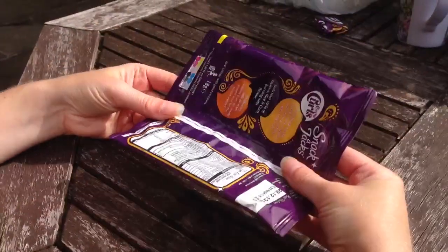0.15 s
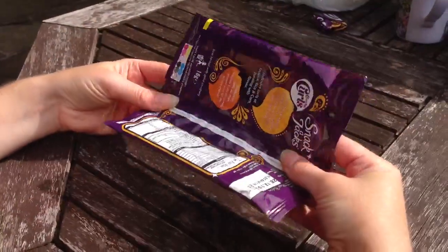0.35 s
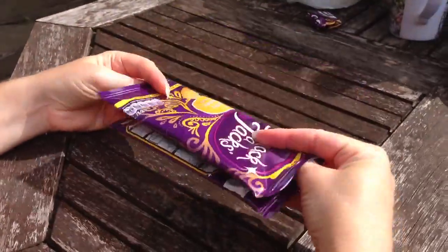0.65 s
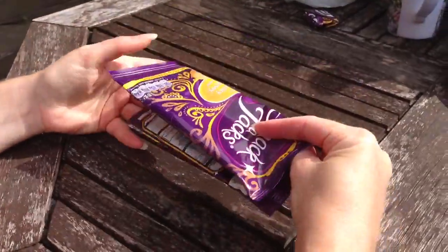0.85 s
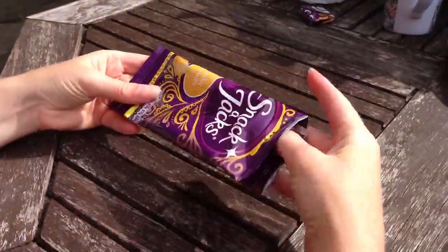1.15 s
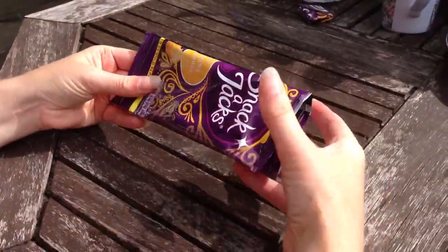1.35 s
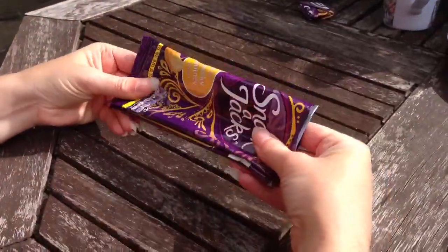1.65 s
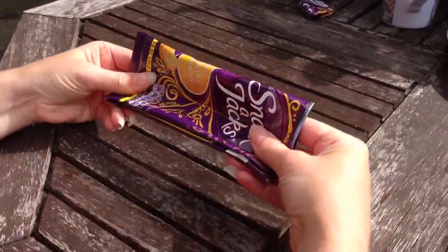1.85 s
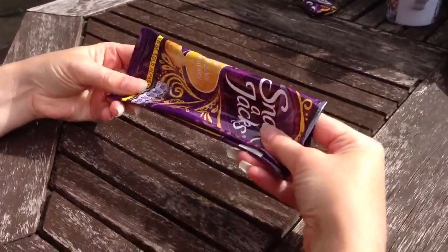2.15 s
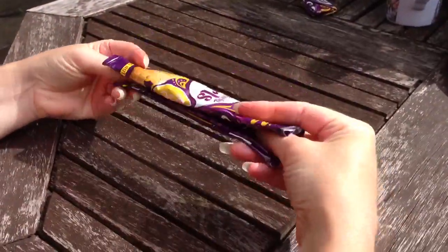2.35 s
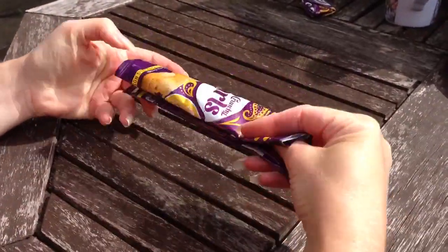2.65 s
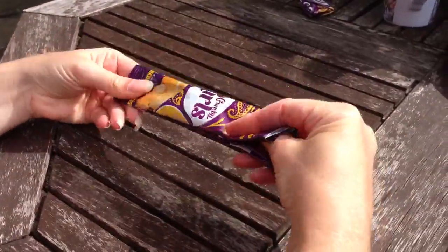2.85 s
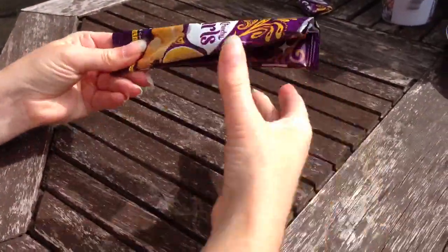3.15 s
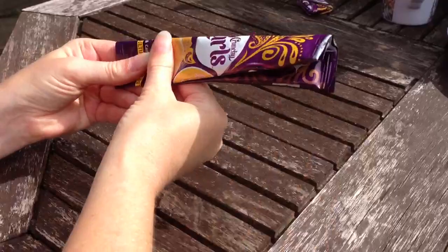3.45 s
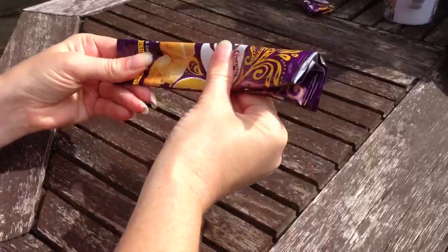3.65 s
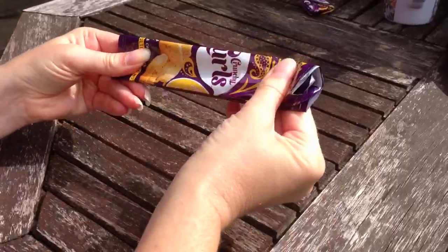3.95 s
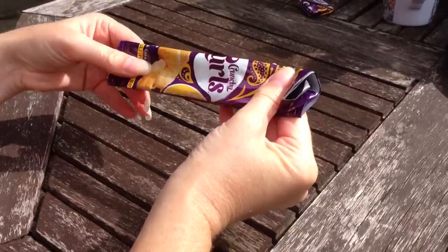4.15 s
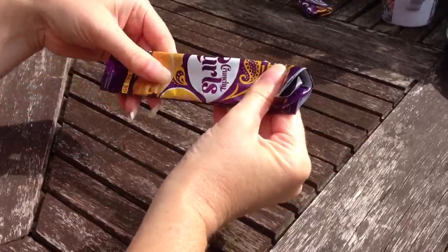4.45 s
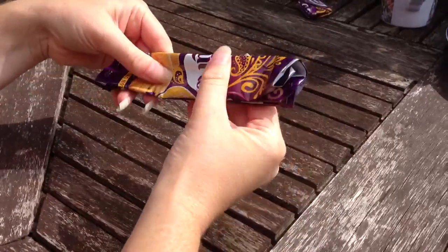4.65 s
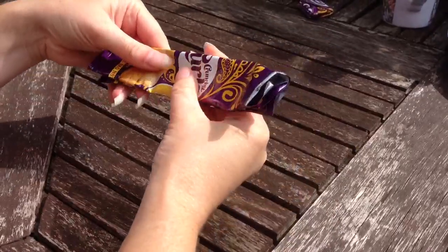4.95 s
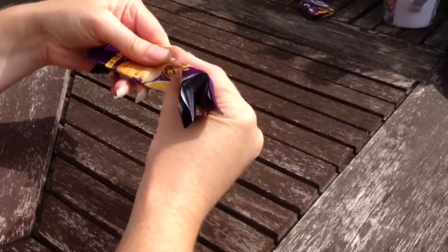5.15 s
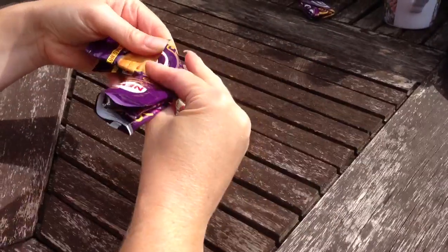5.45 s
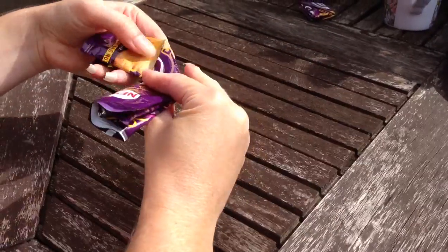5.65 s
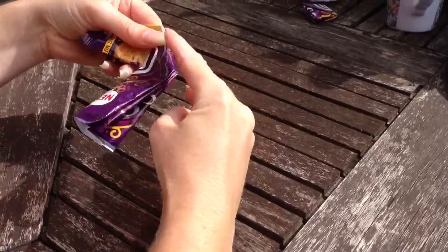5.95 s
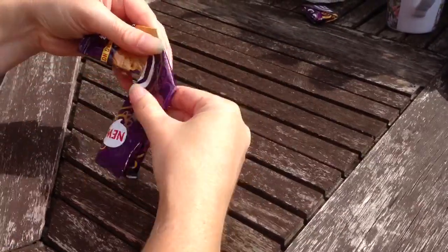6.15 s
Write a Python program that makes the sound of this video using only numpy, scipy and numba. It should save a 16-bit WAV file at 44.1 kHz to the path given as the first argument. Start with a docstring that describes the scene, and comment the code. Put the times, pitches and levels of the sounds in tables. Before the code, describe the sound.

Close, dry crinkling of an empty foil snack packet being folded by hand outdoors. Loud dense snaps and soft low panel flops come first, then a strong sharp snap, a quieter moment, scattered clicks, another dense crunchy burst midway, and sparser, thinner crackles to the end. A very faint, steady outdoor hush lies beneath, picked up by a nearby phone.

```python
"""Hands fold a foil snack packet small over a garden table, 6.3 s, close to a phone, over a soft outdoor hush.
0-0.8 s: dense loud snaps and low panel flops. 1-1.8 s: more, up to the strongest snap. 1.8-2.3 s: quieter.
2.3-3.4 s: scattered snaps, less bass in the crackle. 3.4-3.9 s: dense again. Then sparser to the end.
Snaps are dispersed, ringing foil clicks; crackle is swarms of tiny clicks plus hiss, driven by finger presses;
flops are damped sines; the packet's ring and the garden's scatter are decaying noise; the hush is shaped noise."""
import sys
import numpy as np
from scipy import signal
from scipy.fft import rfft, irfft
from scipy.io import wavfile
from scipy.ndimage import uniform_filter1d
from numba import njit

SR = 44100
rng = np.random.default_rng(int(sys.argv[2]) if len(sys.argv) > 2 else 0)


def to_wav(s):
    """Save 16-bit WAV."""
    ch = np.atleast_2d(s).T  # columns
    pcm = np.round(np.clip(ch, -1, 1) * 32767)  # PCM
    wavfile.write(sys.argv[1], SR, pcm.astype(np.int16))


N = 278712
TIME_S = np.arange(N) / SR

# distant outdoor hush, spectral shape per Hz: freq_hz, relative_db
HUSH = [(18, -60), (30, -36), (64, -22), (99, -16.5), (139, -1.5), (288, -4), (328, -3.5), (460, -5),
        (581, -8), (928, -3), (1520, -11), (1920, -16), (3070, -18.5), (11600, -21.5), (15000, -22)]
HUSH_DB = -62
# resonances of the packet's air and walls: centre_hz, width_hz, gain_db
POCKET = [(1040, 190, -3.5), (2730, 770, 2.5), (5100, 3600, -16), (9600, 8600, -2.5)]
# panels flop and fingertips land: start_s, peak_db (before high-pass), pitch_hz
FLOPS = [(0.041, -48.5, 307), (0.057, -44.5, 133.6), (0.12, -43.5, 362), (0.131, -50, 320),
         (0.458, -45.5, 355), (1.007, -46, 388), (1.283, -51, 270), (1.612, -47.5, 360), (2.075, -56, 387)]
# finger presses, each a run of crackle: start_s, length_s, drive_db, treble_relative_db
PRESSES = [(0.0, 0.064, -46, -7), (0.101, 0.11, -52, -9), (0.37, 0.1, -63, -3), (0.446, 0.094, -46.5, -14),
           (0.528, 0.12, -53, -7), (0.695, 0.053, -60, -1.5), (.745, 0.067, -44.5, -12.5),
           (0.824, .13, -66, -2.5), (1.001, 0.038, -48.5, -7), (1.03, 0.18, -54.5, -6.5),
           (1.119, 0.035, -47, -4.5), (1.28, .022, -51.5, -4), (1.34, 0.21, -67, -4), (1.53, 0.12, -43, -5),
           (1.645, .10, -50.5, -2), (1.766, 0.13, -64, -1.5), (2.005, 0.17, -64, -3.5),
           (2.185, 0.13, -56.5, -4), (2.34, 0.053, -47, -8), (2.403, .11, -55.5, -2.5),
           (2.532, 0.11, -57, -5), (2.637, 0.026, -46.5, -3), (2.67, 0.028, -54, 0),
           (2.823, 0.035, -56.5, -3), (2.856, 0.15, -49, -3.5), (3.022, 0.072, -44.5, -5.5),
           (3.238, .02, -65, 1), (3.432, 0.067, -41.5, -10.5), (3.527, .213, -41.5, -5),
           (3.741, 0.087, -47, -5), (3.845, 0.025, -44, -3.5), (3.873, 0.042, -51.5, -1.5),
           (3.921, 0.052, -58, 0), (3.973, .04, -53, -1), (4.03, 0.14, -64.5, -1.5),
           (4.172, .24, -60.5, -6.5), (4.283, 0.031, -56.5, -5), (4.454, 0.058, -62, -10),
           (4.519, 0.07, -52, -3), (4.615, 0.066, -49, -10), (4.702, 0.17, -63, -10),
           (4.973, 0.037, -56, -3.5), (5.07, 0.038, -58.5, -3), (5.115, 0.11, -55, -4.5),
           (5.236, 0.14, -59, -5), (5.405, 0.046, -56, -6), (5.608, 0.046, -62.5, -17),
           (5.682, 0.043, -54, -7), (5.882, 0.029, -53, -3.5), (5.952, 0.094, -61.5, -0.5),
           (6.181, 0.038, -59.5, -3.5), (6.228, 0.032, -50.5, -10.5), (6.269, 0.06, -59, -5)]
PRESS_ATTACK_S, PRESS_RELEASE_S = 0.0091, 0.012  # time constants of the grip closing and letting go
PRESS_SAG_DB = 2.5  # eases over a press as the foil yields
HOLD_DB, HOLD_TREBLE_DB, HOLD_WAVER_DB = -76, -2.5, 4  # foil stirring in fingers that only hold it
# crackle bass, mostly falling as loose panels are folded tight: time_s, relative_db
LOOSENESS = [(0, -3), (.55, 0), (.8, -5.5), (1.55, -3), (1.8, -5.5), (2.4, -8.5), (2.9, -9.5),
             (3.45, -18.5), (3.85, -9), (4.3, -15), (4.6, -7.5), (5.3, -11), (6.3, -7.5)]
# resonance of the folded foil, strongest while a long flat tube: time_s, centre_hz, ring_relative_db
TUBE = [(0, 1770, 4.5), (.55, 2120, -1), (1.7, 1970, -31), (2.3, 2898, -3), (2.92, 3360, -1),
        (3.06, 2545, 9), (3.45, 2397, 8), (3.8, 2521, -3), (4.0, 2984, -12), (4.3, 3091, -6),
        (4.7, 2456, 7), (5.35, 2398, 5), (5.7, 2902, 2), (6.3, 2996, 1)]
# what foil radiates when it buckles: freq_hz, relative_db
FOIL = [(100, -42.5), (200, -18), (400, -16.5), (680, -17.5), (1020, -11.5), (1350, -13.5), (2000, -5),
        (2600, 0), (4000, -2), (5500, -2.5), (8000, -6), (12000, -10), (15500, -18.5)]
# creases snapping through: peak_time_s, level_db (over 4 ms), ring_hz, ring_db, bass_db, treble_db
SNAPS = [(0.032, -36, 3820, 6, 4.5, -7), (0.0614, -40, 1860, 12, 22, 6), (0.1079, -43.5, 6400, 19, 7, 4),
         (0.119, -41.5, 5740, 7, 24, 6), (0.1354, -37, 5620, 7, 9, -4),
         (0.186, -36.0, 6130, 12.5, 18.5, 10), (0.189, -33.0, 4000, 5.5, 13.5, 9),
         (0.291, -54, 2010, 20, 5, -9), (0.386, -46, 2390, 8.5, 17, 13), (0.426, -38.5, 10350, 11, 23, 5),
         (0.449, -32, 2220, 12, -7, 4.5), (0.4537, -31.5, 1650, 20, -8, 8),
         (0.4677, -33.5, 3500, 14, 13, 5), (0.491, -36, 1640, 10, 6, -4), (0.5017, -40.0, 7000, 8, 19, 5.5),
         (0.5257, -39, 2480, 4, 6, -1), (0.5669, -39, 2690, 8, 18.5, 7), (0.637, -28, 3380, 12.5, 5, 5.5),
         (0.7414, -32, 4830, 6.5, 7, -1), (0.7709, -29.5, 5040, 14.5, 16, 18),
         (0.7904, -38, 5850, 13, 18, -1), (0.8022, -33.5, 1580, 8, 3, 4), (1.007, -38.5, 1654, 14, 2, -2),
         (1.0997, -38.5, 3490, 10, 10, 14), (1.1157, -34.5, 6000, 9.5, 23, 23.5),
         (1.1306, -35, 5150, 14, 12, 3), (1.1808, -42.5, 3450, 10, 15, 4), (1.22, -32.5, 6010, 18, 10, 1),
         (1.262, -39, 5060, 12, -4, -7), (1.281, -41.5, 5880, 12, 14, 7), (1.345, -45.5, 3540, 12, 15, -3),
         (1.4378, -46, 3530, 7, 13, -6), (1.5323, -38, 4120, 11, 1, -16), (1.5409, -36.5, 5620, 21, 11, -9),
         (1.5773, -35.5, 6320, 18, 7, -1), (1.628, -30.5, 5810, 9, 9, 7),
         (1.633, -26.0, 6160, 8.5, 0.5, -4), (1.6676, -34.0, 6120, 12, 10, 11),
         (1.679, -35.0, 8270, 9, -12, 2), (1.6965, -39.0, 1850, 13.5, 8, -3),
         (1.7029, -40.0, 5690, 5, 15, 5), (1.7337, -38.5, 3360, 5, 7, -1), (1.7427, -35.5, 5520, 8, 0, -9),
         (1.786, -42, 1820, 10, 7.5, 6), (1.7912, -47, 4400, 18, 15, 19), (1.8421, -46, 4470, 5, 5, 8),
         (2.0288, -48.5, 4660, 6, 3, -12), (2.078, -45.0, 3450, 8, 18, 6.5),
         (2.1641, -43.0, 8050, 12, -2, -9), (2.1812, -42, 4780, 7, 17, 5), (2.1906, -43.5, 4780, 12, 2, 6),
         (2.2254, -42.5, 10300, 9, 6, -8), (2.3107, -34.5, 2470, 8, 9, -1), (2.3439, -42, 2680, 8, 6.5, -5),
         (2.3504, -29, 3390, 15, 7, 9), (2.4437, -40, 4825, 6, 11, 11), (2.479, -40.5, 3040, 10, 2, -4),
         (2.4864, -39.5, 3250, 9, 4, 3.5), (2.507, -44, 2980, 12, 11, -10),
         (2.6415, -31.5, 3643, 14.5, -6, 6.5), (2.8758, -40.5, 3426, 13, 16, 15),
         (2.9534, -40.0, 3260, 7, -5, 2), (2.99, -41, 2975, 11.5, 3, -5), (3.0285, -35.5, 2900, 14, 4, 1),
         (3.0551, -39, 3365, 17, -4.5, 6), (3.0762, -40.5, 2430, 13, -2, -12),
         (3.2313, -48, 2410, 15, 14, 24), (3.268, -52.5, 4670, 11, 7, 3), (3.402, -47, 6500, 6, -2.5, -6),
         (3.4267, -40.5, 2420, 7, -12, -9), (3.4506, -33, 2280, 13, 7, 1.5), (3.487, -36, 2403, 17, 1, 4),
         (3.5444, -35.5, 5010, 9, -4, 7), (3.5719, -38.5, 2480, 18, 13, 4), (3.6077, -34, 2410, 15, 11, 4),
         (3.6438, -35, 4870, 9, 6, -12), (3.6764, -35.5, 2490, 14, 9, -4), (3.6844, -32, 4730, 15, 4, -21),
         (3.694, -29.5, 2360, 13, -17, -1), (3.7305, -34.5, 2467, 12, 1, -15),
         (3.8145, -36.5, 1634, 13, -7, 5), (3.848, -31.5, 2800, 9, 0, 9), (3.8626, -35, 7820, 11, 11, 4.5),
         (3.9018, -37, 3206, 9, 14.5, 5), (4.0076, -32.0, 5130, 18, -6, 7),
         (4.0383, -39.0, 7970, 14.5, 3, -11), (4.0864, -52.5, 4600, 9, 1, -12),
         (4.189, -49.5, 6440, 13, 11, 7), (4.2307, -46.5, 5520, 11, 10, -2), (4.29, -40.5, 3250, 21, 4, 26),
         (4.32, -38.5, 6270, 9, 6.5, -3), (4.5681, -43, 11490, 6, -1, -12),
         (4.6155, -42.5, 2800, 17, 10, 0), (4.6272, -37.5, 2940, 9.5, -1, -5),
         (4.65, -38.5, 4770, 12, 0, -1), (4.6829, -35.0, 2160, 7.5, -3, -12),
         (4.8752, -47, 5410, 9, 10, 10), (4.9306, -51, 5190, 8, 16, 10), (5.0028, -43.5, 2750, 20, -1, 4),
         (5.127, -41.0, 4940, 9, -16, -5), (5.197, -33.5, 4980, 14.5, 6, -29),
         (5.2872, -41.5, 3060, 10, -1, -11), (5.33, -36.5, 2340, 13.5, 7, 14),
         (5.373, -41, 1788, 20, -11, 2.5), (5.383, -38.5, 5250, 12.5, 9, 2),
         (5.424, -44.5, 4900, 9, 14.5, 6), (5.4566, -39.5, 2550, 10.5, 12, 0),
         (5.6183, -43.5, 2960, 8, -4, 11.5), (5.6475, -42.5, 3194, 12, -2, 0),
         (5.6944, -41, 3280, 15, 6, 16), (5.7046, -40, 1576, 17, 11, 19.5),
         (5.728, -45.5, 2790, 12, 17, -8), (5.8812, -35, 5460, 9, 7.5, -4),
         (5.9667, -33.0, 3340, 17, -6, 1), (5.9997, -48, 2760, 10.5, 10, 12),
         (6.2378, -46, 3523, 17, 9, -5), (6.2575, -41.5, 1673, 16, -3, -2)]
TOP_HZ = 15500


def undb(db):
    """Decibels to gain."""
    return 10 ** (np.asarray(db) / 20)


def unit(x):
    """Scale to rms 1."""
    return x / np.sqrt(np.mean(x ** 2) + 1e-20)


def spectrum_db(points, hz):
    """Interpolate (Hz, dB) points on a log-frequency axis."""
    at_hz, db = np.transpose(points)
    return np.interp(np.log(hz + 1), np.log(at_hz), db)


def curves(table):
    """Columns of a time table, joined by straight lines."""
    s, *columns = np.transpose(table)
    return [np.interp(TIME_S, s, column) for column in columns]


def causal(db):
    """Minimum-phase response with this dB spectrum, by folding the cepstrum."""
    cepstrum = irfft(db * np.log(10) / 20)
    half = len(cepstrum) // 2
    cepstrum[1:half] *= 2
    cepstrum[half + 1:] = 0
    return irfft(np.exp(rfft(cepstrum)))


def band(x, kind, hz, order=3):
    """Butterworth filter."""
    return signal.sosfilt(signal.butter(order, hz, kind, fs=SR, output="sos"), x)


def walk(rate_hz):
    """Random levels held 1 / rate_hz s and slewed twice."""
    hold = int(SR / rate_hz)
    steps = np.repeat(rng.standard_normal(N // hold + 2), hold)
    return 0.401 * uniform_filter1d(uniform_filter1d(steps, hold), hold)[:N]


@njit
def resonate(x, hz, width_hz):
    """State-variable band-pass with a moving centre, gain 1 there."""
    y, band_state, low_state = np.empty(len(x)), 0., 0.
    for i in range(len(x)):
        g, damping = np.tan(np.pi * hz[i] / SR), width_hz / hz[i]
        v = (band_state + g * (x[i] - low_state)) / (1 + g * (g + damping))
        band_state = 2 * v - band_state
        low_state += 2 * g * v
        y[i] = damping * v
    return y


def hush(waver_db=2.5):
    """Distant outdoor noise that barely wavers."""
    colour = undb(spectrum_db(HUSH, np.fft.rfftfreq(N, 1 / SR)))
    noise = irfft(rfft(rng.standard_normal(N)) * colour, N)
    return unit(noise) * undb(HUSH_DB + waver_db * walk(4.81))


def garden(x, wet_db=-19, t60_s=0.073, size=12000):
    """Faint scatter from table, body and nearby walls: decaying low-passed noise after 3 ms."""
    t = np.arange(size) / SR
    tail = band(rng.standard_normal(size), "low", 7800, order=1)
    tail *= undb(-60 * t / t60_s) * (t > 0.003)
    return undb(wet_db) * signal.fftconvolve(x, tail / np.linalg.norm(tail))[:N]


def pocket(x, wet_db=-15.5, t60_s=0.019, build_s=0.0017, size=4096):
    """The hollow packet keeps each click ringing briefly at its resonances."""
    hz, t = np.fft.rfftfreq(size, 1 / SR), np.arange(size) / SR
    colour = sum(undb(db) / (1 + 2j * (hz - centre) / width) for centre, width, db in POCKET)
    tail = rng.standard_normal(size) * undb(-60 * t / t60_s) * (1 - np.exp(-t / build_s))
    response = irfft(rfft(tail / np.linalg.norm(tail)) * colour)
    return undb(wet_db) * signal.fftconvolve(x, response)[:N]


def flops(t60_s=0.031, rise_s=0.0023, size=4000):
    """Soft pats: a whole panel moves as one quickly damped sine."""
    out, t = np.zeros(N + size), np.arange(size) / SR
    envelope = (1 - np.exp(-t / rise_s)) * undb(-60 * t / t60_s)
    for start_s, peak_db, pitch_hz in FLOPS:
        wave = np.sin(2 * np.pi * pitch_hz * t) * envelope
        start = int(start_s * SR)
        out[start:start + size] += undb(peak_db) * wave / np.abs(wave).max()
    # the flops carry almost nothing below about 130 Hz
    return band(out[:N], "high", 130, order=5)


def effort():
    """Drive and relative treble (dB) of the fingers: every press closes, eases off and lets go."""
    power = undb(HOLD_DB + HOLD_WAVER_DB * walk(9)) ** 2
    treble = power * undb(HOLD_TREBLE_DB) ** 2
    for start_s, length_s, drive_db, treble_db in PRESSES:
        early_s = np.maximum(start_s - TIME_S, 0)
        late_s = np.maximum(TIME_S - start_s - length_s, 0)
        sag_db = PRESS_SAG_DB * (np.clip((TIME_S - start_s) / length_s, 0, 1) - 0.5)
        fade = np.exp(-np.minimum(early_s / PRESS_ATTACK_S + late_s / PRESS_RELEASE_S, 20))
        press = (undb(drive_db - sag_db) * fade) ** 2
        power = power + press
        treble = treble + press * undb(treble_db) ** 2
    return 10 * np.log10(power), 10 * np.log10(treble / power)


def facet(ring_hz, ring_db, bass_db, treble_db, ring_ln_width=0.167, scatter=0.36, scatter_s=0.0016,
          travel_at_1khz_s=0.0017, size=512):
    """One buckle, energy 1: a click rings its facet, then scatters off neighbouring creases."""
    hz, t = np.fft.rfftfreq(size, 1 / SR) + 1, np.arange(size) / SR
    low, high = 1 / (1 + (hz / 1900) ** 4), 1 / (1 + (6500 / hz) ** 4)
    ring = ring_db / (1 + (np.log(hz / ring_hz) / ring_ln_width) ** 2)
    click = causal(spectrum_db(FOIL, hz) + bass_db * low + treble_db * high + ring)
    # dispersive bending waves: treble arrives first, the click becomes a tiny chirp
    click = irfft(rfft(click) * np.exp(-4j * np.pi * travel_at_1khz_s * np.sqrt(1000 * hz)))
    paths = rng.standard_normal(size) * np.exp(-t / scatter_s)
    paths *= scatter / np.linalg.norm(paths)
    paths[0] += 1  # direct path
    wave = signal.fftconvolve(click, paths)[:size]
    return rng.choice([-1, 1]) * wave / np.linalg.norm(wave)


def swarm(rate_hz, spread_db, count):
    """Tiny buckles at random times, mostly faint and a few strong, shared among count facets."""
    out = np.zeros(N)
    for _ in range(count):
        ring_hz = 4200 * np.exp(0.5 * rng.standard_normal())
        bass_db, treble_db = 4 * rng.standard_normal(2)
        wave = facet(ring_hz, 9.6, bass_db, treble_db, scatter=0.77)
        starts = np.flatnonzero(rng.random(N) < rate_hz / (count * SR))
        sizes = undb(spread_db * np.minimum(rng.exponential(size=len(starts)), 3.1))
        places = starts[:, None] + np.arange(len(wave))
        out += np.bincount(places.ravel(), np.outer(sizes, wave).ravel(), N)[:N]
    return out


def crackle(rate_hz=780, rate_growth=0.38, spread_db=7.5, rub=0.27, rub_growth=0.1, tube_width_hz=600,
            flex=0.092, bass_db=-2.5, body_db=-1.5, treble_db=-1):
    """Harder folding sets off more buckles; broad loose panels sound low, tight folds high."""
    work_db, high_db = effort()
    low_db, = curves(LOOSENESS)
    tube_hz, tube_db = curves(TUBE)
    force = undb(work_db + 52.5)  # 1 for an ordinary press
    grains = unit(swarm(rate_hz * force ** rate_growth, spread_db, count=64))
    # fingers feed in energy steadily, buckles release it in jerks: even out the level over 41 ms
    grains = grains / np.sqrt(uniform_filter1d(grains ** 2, size=1800) + 1e-4)
    # foil sliding on foil: thin continuous hiss, more of it when squeezed harder
    hz = np.fft.rfftfreq(N, 1 / SR)
    hiss = irfft(rfft(rng.standard_normal(N)) * undb(spectrum_db(FOIL, hz)), N)
    foil = rfft(grains + rub * force ** rub_growth * unit(hiss))
    below, above = 1 / (1 + (hz / 1750) ** 8), 1 - 1 / (1 + (hz / 6300) ** 8)
    bass, body, treble = (unit(irfft(foil * share, N)) for share in (below, 1 - below - above, above))
    # the tube gathers the middle range into one ring, whose pitch shifts as the fingers flex it
    tube_gain = undb(tube_db)
    ring = tube_gain * resonate(body, tube_hz * np.exp(flex * walk(35)), 1. * tube_width_hz)
    body = (body + ring) / np.sqrt(1 + 0.48 * tube_gain + 0.28 * tube_gain ** 2)
    # foil this small radiates no deep bass
    bass = band(bass, "high", 125)
    mix = bass * undb(low_db + bass_db) + body * undb(body_db) + treble * undb(high_db + treble_db)
    return undb(work_db) * mix


def snaps(late_db=-6, late_s=0.0004, early_db=-14, early_s=0.0016, size=512):
    """Each snap is a faint early click, the main click and a weaker late one, alike in colour."""
    out = np.zeros(N + SR)
    span = np.sqrt(0.004 * SR)  # energy 1 to rms 1 over 4 ms
    for peak_s, level_db, *colour in SNAPS:
        early, main, late = (np.pad(facet(*colour), size) for _ in range(3))
        gaps_s = np.array([early_s, late_s]) * rng.uniform(0.4, 1.8, size=2)
        lead, lag = (gaps_s * SR).astype(int)
        wave = undb(early_db) * np.roll(early, -lead) + main + undb(late_db) * np.roll(late, lag)
        start = int(peak_s * SR) - np.argmax(np.abs(wave))
        out[start:start + len(wave)] += wave / np.linalg.norm(wave) * span * undb(level_db)
    return out[:N]


def scene():
    """The foil, the packet's short ring and the open air."""
    foil = snaps() + crackle() + flops()
    return (foil + pocket(foil) + garden(foil) + hush())[None]


def record(dry):
    """The phone cuts the top: steep elliptic low-pass."""
    return signal.sosfilt(signal.ellip(8, 0.2, 70, TOP_HZ, fs=SR, output="sos"), dry)


dry = scene()
out = record(dry)
to_wav(out)
```